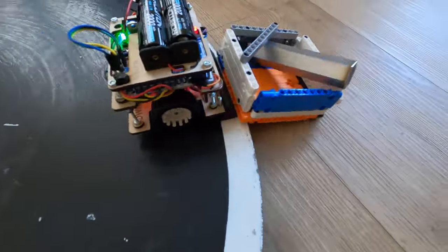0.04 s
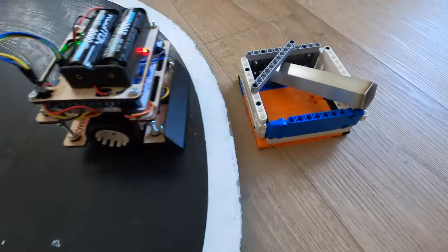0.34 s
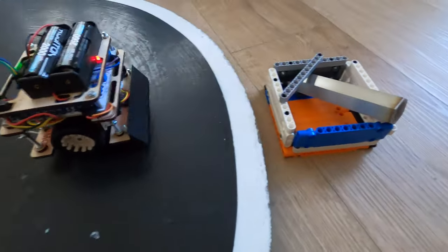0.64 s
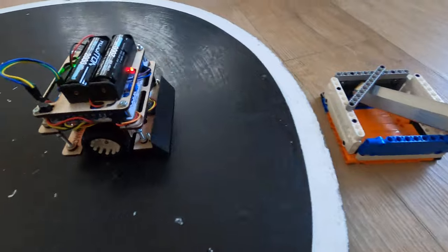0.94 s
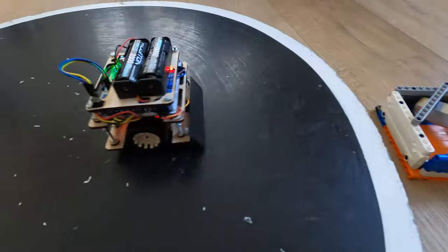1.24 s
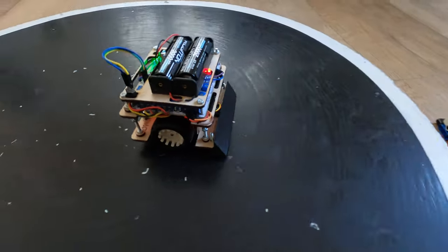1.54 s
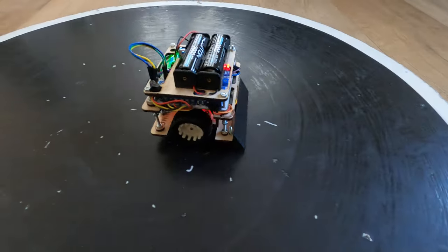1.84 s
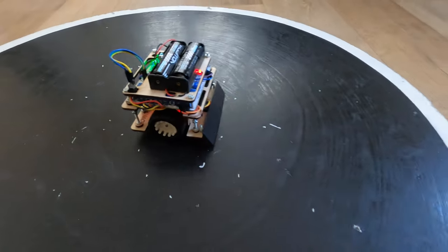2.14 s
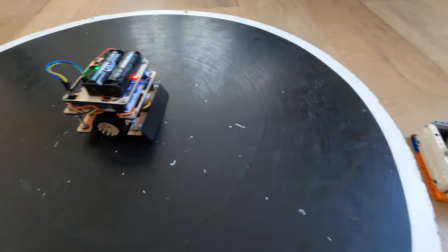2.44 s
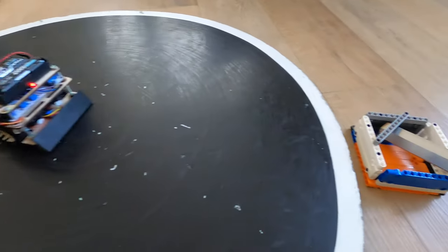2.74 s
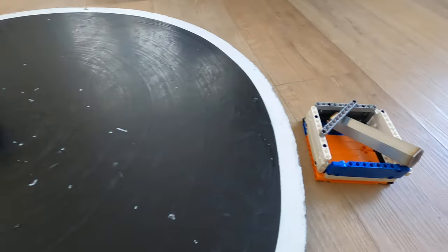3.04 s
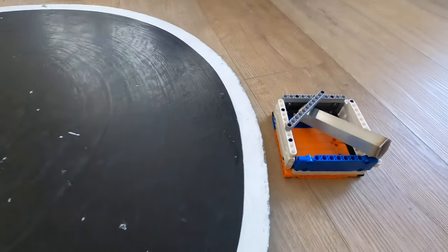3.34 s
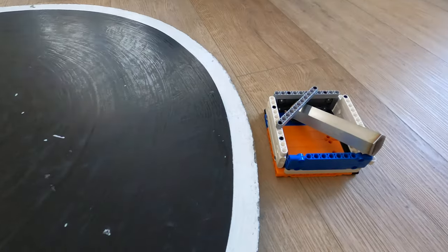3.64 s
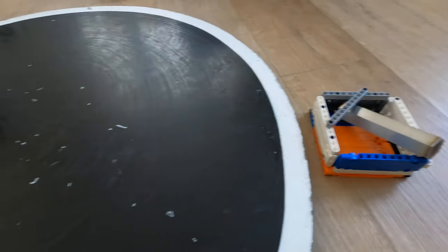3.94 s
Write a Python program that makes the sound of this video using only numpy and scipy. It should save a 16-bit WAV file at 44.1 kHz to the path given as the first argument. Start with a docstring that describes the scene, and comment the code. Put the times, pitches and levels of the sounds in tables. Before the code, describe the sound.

A small robot shoves a scraping plastic box, then whirs and rattles around indoors.

```python
"""A box of plastic bricks scrapes off a round board and clacks onto a wooden floor, shoved by a small
wheeled robot that then drives about. The box scrapes because its base catches and slips very fast.
The robot's gear teeth click into a whir, its motors whine faintly, its axle squeaks and its loose frame
rattles, while the board booms under the wheels. The robot ends up to the left, in a small room."""
import sys
import numpy as np
from scipy import signal
from scipy.fft import rfft, irfft, next_fast_len
from scipy.io import wavfile
from scipy.ndimage import uniform_filter1d

SR = 44100
rng = np.random.default_rng(int(sys.argv[2]) if len(sys.argv) > 2 else 0)


def unload_audio(sound):
    """Save the sound as a 16-bit wav file, at the path given as the first command line argument."""
    columns = np.transpose(np.atleast_2d(sound))
    # keep every value between -1 and 1, then stretch to whole-number steps
    steps = np.round(np.clip(columns, -1, 1) * 32767)
    wavfile.write(sys.argv[1], SR, steps.astype(np.int16))


N = 176400
T = np.arange(N) / SR

# Tone of the background noise, the echo, and the left microphone against the right: (pitch [Hz], gain [dB])
BACKGROUND_TONE = [(20, -12), (70, 7), (160, 1), (300, -11.5), (800, -20), (5000, -22), (15500, -36)]
ECHO_TONE = [(60, -25), (400, -9.5), (1200, -6.5), (3000, -7), (6000, -12.5), (12000, -2.5)]
MIC_BALANCE = [(100, 0.5), (600, -2), (1300, 0), (2800, 2), (5500, -3), (11000, -4)]
# Where the robot is heard: (time [s], left over right [dB], delay on the left [samples])
ROBOT_PATH = [(0, -1.5, 1.1), (.3, -1.5, 1.55), (.6, 2, 0.18), (1.2, 1, 0.57), (2.2, -1, 1.2),
              (2.6, 2, 0.023), (3.0, 4.5, 0.78), (3.5, 5.5, 1.2), (4, 5, 0.94)]
# Wheel jolts that swell the board's boom: (peak time [s], level [dB], half-width [s])
WHEEL_JOLTS = [(.04, -30.5, 0.051), (.185, -29.5, 0.07), (.5, -41.5, 0.19), (0.659, -40.5, 0.029),
               (.8, -41.5, 0.081), (0.899, -41, 0.036), (1.08, -46, 0.021), (1.25, -36.5, 0.04),
               (1.41, -37.5, 0.087), (1.657, -37, 0.034), (1.79, -47, 0.065), (2.03, -47.5, 0.095),
               (2.18, -42, 0.038), (2.57, -41.5, .055), (2.81, -41, 0.091), (3.05, -47.5, .035),
               (3.241, -42, 0.028), (3.45, -39, 0.046), (3.56, -39, 0.12), (3.84, -32.5, 0.067),
               (3.95, -38, 0.053)]
# When the motors are throttled: (start [s], end [s], level [dB])
THROTTLE_SPELLS = [(1.09, 1.383, -0.5), (1.67, 2.044, -2.5), (2.125, 2.586, -2), (2.72, 2.783, -4),
                   (3.133, 3.46, -10.5)]
# Squeaks of the dry axle: (time [s], level [dB], pitch [Hz])
AXLE_SQUEAKS = [(1.675, -44.5, 6700), (2.075, -42.5, 7800), (2.138, -49, 6300), (2.675, -49.5, 7460),
                (2.725, -43.5, 6270), (2.87, -49, 7130), (2.925, -49, 6800)]
# How loud the gears run: (time [s], whir level [dB], treble level [dB])
GEAR_LEVELS = [(0, -51, -50), (.4, -44, -54), (.6, -43, -44.5), (.74, -48.5, -54), (.83, -47.5, -53),
               (1.1, -47, -53), (1.53, -47, -49.5), (1.63, -46.5, -56.5), (1.95, -47, -50),
               (2.3, -47, -54.5), (2.58, -45, -50.5), (2.75, -50, -56.5), (3.0, -50.5, -60),
               (3.35, -50.5, -56), (3.5, -46, -60), (3.72, -50, -55.5), (3.86, -48.5, -51), (4, -40, -45)]
# Gears sing as a wheel's load changes: (start [s], length [s], from [Hz], to [Hz], level [dB])
GEAR_SONGS = [(1.32, 0.17, 2820, 2927, -45), (1.675, 0.083, 4760, 5150, -54), (1.68, .12, 2730, 2800, -56),
              (1.83, .16, 4490, 4340, -65), (1.85, .19, 2752, 2920, -46.5), (2.66, 0.44, 3300, 3310, -59.5),
              (2.62, 0.86, 7670, 7120, -62.5)]
# Where the gear housings ring: (pitch [Hz], level relative to the whir curve [dB])
HOUSING_BANDS = [(2880, -12), (4250, -10.5)]
# Rattles of the loose frame: (time [s], level [dB])
FRAME_RATTLES = [(0.475, -14.5), (0.501, -16), (0.524, -9.5), (.553, -9), (0.594, -12), (0.623, -10.5),
                 (.643, -12.5), (0.689, -11.5), (0.79, -6.5), (0.826, -11.5), (1.237, -12), (1.391, -16.5),
                 (1.437, -3), (1.759, -12.5), (1.813, -15.5), (1.943, -14.5), (2.008, -9), (2.063, -17),
                 (2.133, -17), (2.231, -12.5), (2.46, -13), (2.497, -7.5), (2.576, -9.5), (2.609, -17),
                 (2.78, -15.5), (3.165, -19), (3.223, -15.5), (3.395, -16.5)]
# Sharp ticks from the robot, some from its gears: (time [s], level [dB], pitch [Hz])
ROBOT_TICKS = [(.56, -11.5, 3670), (.582, -11.5, 3600), (.603, -13.5, 6400), (0.695, -15, 3930),
               (.798, -15, 3720), (.835, -11, 3700), (1.445, -9.5, 3870), (1.59, -22, 6300),
               (1.623, -16, 3740), (1.764, -23, 6960), (1.818, -22, 3700), (2.015, -9, 3830),
               (2.237, -21, 3660), (2.504, -10, 6520), (2.583, -15, 6300), (3.491, -12, 3880)]
# How the board, the rattled frame and the bumped frame ring: (pitch [Hz], level [dB], time to fade 60 dB [s])
BOARD_RING = [(69.6, -0.5, 0.32), (97.2, -7, 0.36), (128, -20, 0.3), (171, -20.5, 0.27)]
FRAME_RING = [(258, -17.5, 0.041), (383, -14.5, 0.063), (1000, -5.5, 0.029), (1163, -7.5, 0.035),
              (1810, -3, 0.015), (2826, 2.5, 0.023), (3560, -2, 0.0082), (3980, -5, 0.024)]
BUMP_RING = [(1083, -5.5, 0.036), (1910, 2, 0.022), (2460, -7, 0.013), (3080, 4, 0.031), (3620, 3.5, 0.023),
             (4100, -7, 0.021)]
# Blows to the robot and to the box: (time [s], level [dB], fade time [s], brightness [dB per octave])
ROBOT_BUMPS = [(2.497, -9, .004, -4), (2.577, -13, .004, -8.5), (3.454, -15, 0.0024, -2.5),
               (3.4838, -3, 0.0021, -1), (3.571, -19.5, 0.0039, -3), (3.649, -12, 0.0042, -3),
               (3.765, -12.5, 0.0024, -1), (3.821, -12.5, 0.0046, 4), (3.893, -8, 0.0024, -2),
               (3.963, -8.5, 0.002, -2.5)]
BOX_HITS = [(.0065, 8.5, 0.0042, -6.5), (.013, -7, 0.0019, -0.5), (.158, -8, 0.0012, -9),
            (.272, 9, 0.00062, -1), (.2734, 13, 0.00093, 0.5), (.320, -0.5, 0.0011, -3.5)]
# The box sliding: (time [s], level [dB])
SLIDE_LEVELS = [(0, -43), (.012, -22.5), (.035, -30), (.065, -30), (.085, -28), (.11, -23.5), (.13, -24.5),
                (.141, -17.5), (.156, -19), (.168, -33.5), (.2, -33), (.21, -28), (.232, -30), (.262, -31),
                (.272, -25.5), (.282, -48), (.32, -35.5), (.4, -45), (.5, -100)]
# The base of the box juddering: (time [s], pitch [Hz], level [dB])
BOX_JUDDER = [(.02, 1700, -50), (.04, 900, -38), (.125, 1000, -36), (.148, 1150, -41), (.17, 1350, -40),
              (.22, 1550, -37), (.265, 1500, -33), (.285, 1500, -100)]
# Which pitches are strong in each sound: (pitch [Hz], gain [dB])
ROLLING_TONE = [(20, -35), (40, -28), (65, 2.5), (95, 2), (125, -11), (165, -4.5), (260, -25), (600, -67)]
SIZZLE_TONE = [(3500, -27), (5500, -1.5), (6400, -1), (7000, 0), (7900, 3), (9500, -7), (11500, -7.5),
               (13500, -17), (15500, -33)]
WHIR_TONE = [(130, 2.5), (260, -4.5), (390, 1), (560, -5), (690, -11.5), (830, -13), (1060, 0.5),
             (1350, -9.5), (1520, -7.5), (1850, -1.5), (2400, -2), (2850, -1.5), (3200, -0.5), (4150, 2),
             (5500, -4), (6500, -6.5), (9000, -30)]
SCUFF_TONE = [(100, -9), (380, 2), (750, -5.5), (1300, -20), (3000, -3.5), (8000, -25)]
BUMP_TONE = [(150, -12.5), (400, 2.5), (750, -14.5), (1100, 9.5), (1450, -9.5), (1950, 7), (2600, 2.5),
             (3500, 12), (4800, 1.5), (7000, -7), (15500, -37)]
SLIDE_TONE = [(130, -5), (300, -8.5), (520, -7.5), (720, -2), (1000, 1), (1500, -2.5), (2100, -2),
              (3100, -2), (4400, -5.5), (5300, -10.5), (8000, -16.5), (15500, -39.5)]
CLACK_TONE = [(120, -4.5), (300, -10.5), (600, 3.5), (1200, -1.5), (2200, -1), (3400, 7.5), (4300, 4),
              (5300, -1.5), (7000, -15), (15500, -29)]


def from_db(db):
    """Turn decibels into a number to multiply by."""
    return 10 ** (np.asarray(db) / 20)


def rms_one(x):
    """Scale a steady sound to an average power of 1."""
    return x / np.sqrt(np.mean(x ** 2) + 1e-20)


def energy_one(x):
    """Scale a short sound to a total energy of 1."""
    return x / np.sqrt(np.sum(x ** 2) + 1e-20)


def in_time(rows):
    """Join a table's points with lines: one curve for each column after the time."""
    s, *columns = np.transpose(rows)
    return [np.interp(T, s, c) for c in columns]


def add(out, s, sound):
    """Mix a sound in at s seconds."""
    i = int(np.clip(s * SR, 0, N - 1))
    out[i:i + len(sound)] += sound[:N - i]


def sine(hz):
    """A pure tone that follows a pitch curve."""
    return np.sin(2 * np.pi * np.cumsum(hz) / SR)


def swell(s, width_s):
    """A bell-shaped rise and fall."""
    return np.exp(-((T - s) / width_s) ** 2)


def shaped(x, tone, tilt_db=0):
    """Filter a sound through (pitch [Hz], gain [dB]) points, tilted per octave around 2 kHz."""
    n = next_fast_len(2 * x.shape[-1], real=True) // 2 * 2
    octave = np.log2(np.arange(n // 2 + 1) * SR / n + 1)
    hz, db = np.transpose(tone)
    gain_db = np.interp(octave, np.log2(hz), db) + tilt_db * np.clip(octave - 11, -2, 2)
    # These steps make the filter ring only after a click, never before it.
    cepstrum = irfft(np.log(from_db(gain_db)))
    cepstrum[1:n // 2] *= 2
    cepstrum[n // 2 + 1:] = 0
    return irfft(rfft(x, n) * np.exp(rfft(cepstrum)))[..., :x.shape[-1]]


def drift(hz):
    """A smooth random wobble of about size 1; more hz makes it faster."""
    r = np.exp(-80 * np.pi * hz / SR)
    slow = signal.lfilter([1], [1, -2 * r, r * r], rng.standard_normal(N // 40 + 2002))[2000:]
    return np.interp(np.arange(N) / 40, np.arange(len(slow)), rms_one(slow))


def clicks(per_s, spread_db):
    """Clicks at random times; more spread makes their sizes less even."""
    sizes = from_db(spread_db * np.minimum(rng.exponential(1, N), 4))
    return (rng.random(N) < per_s / SR) * sizes * rng.choice([-1, 1], N)


def burst(fade_s):
    """The quickly dying hiss of two things touching."""
    fade = np.exp(-T[:8192] / fade_s)
    spectrum = rfft(rng.standard_normal(len(fade)) * fade)
    even_noise = irfft(spectrum / (abs(spectrum) + 1e-9))
    return energy_one(even_noise * np.sqrt(fade))


def ringing(modes, vary_db):
    """A struck object rings with several fading tones, their strengths varied by chance."""
    t, out = T[:SR // 2], 0
    for k, (hz, db, fade_s) in enumerate(modes):
        level = from_db(db + vary_db * rng.normal() - 60 * t / fade_s)
        out += (-1) ** k * level * np.sin(2 * np.pi * hz * t)
    return out


def knocks(rows, tone):
    """Blows on plastic that die away at once."""
    out = np.zeros(N)
    for s, db, fade_s, tilt_db in rows:
        add(out, s, from_db(db) * energy_one(shaped(burst(fade_s), tone, tilt_db)))
    return out


def placed(x):
    """Loudness and delay at the two microphones follow the robot."""
    pan_db, lag = in_time(ROBOT_PATH)
    left = np.interp(T - lag / SR, T, x)
    return np.array([left * from_db(pan_db / 2), x * from_db(-pan_db / 2)])


def background():
    """A faint, low rumble, nearly the same on both sides."""
    noise = rng.standard_normal(N) + 0.35 * rng.standard_normal((2, N))
    return from_db(-54.5) * rms_one(shaped(noise, BACKGROUND_TONE))


def room_echo(x, fade_s=0.19, gap_s=0.004, change_s=0.1986):
    """Six short stereo echoes take turns, so the room's sound shifts as the robot moves."""
    t, out = T[:SR // 2], np.zeros((2, N))
    tails = rng.standard_normal((6, 2, len(t))) * from_db(-60 * t / fade_s) * (t > gap_s)
    for k, pair in enumerate(tails):
        turn = (T / change_s + k) % len(tails)
        share = np.sqrt(np.maximum(0, 1 - abs(turn - 1)))
        out += [signal.fftconvolve(x * share, energy_one(tail))[:N] for tail in pair]
    return shaped(out, ECHO_TONE)


def board_boom(boom_hz=71.4, drop_s=0.275, low_cut_hz=38):
    """The wheels keep the board's lowest note booming; the falling box strikes it once."""
    jolt_power = sum((from_db(db) * swell(s, width_s)) ** 2 for s, db, width_s in WHEEL_JOLTS)
    level = np.sqrt(from_db(-58) ** 2 + jolt_power)
    boom = from_db(-0.5) * np.sqrt(2) * sine(boom_hz + 4 * drift(10.7))
    rolling = from_db(-9.5) * rms_one(shaped(rng.standard_normal(N), ROLLING_TONE))
    out = level * (boom + rolling)
    add(out, drop_s, from_db(-15) * ringing(BOARD_RING, vary_db=1))
    return signal.sosfilt(signal.butter(2, low_cut_hz, "high", fs=SR, output="sos"), out)


def motor_whine(switch_hz=2385, beat_hz=9.2):
    """Current switched on and off makes the motors sing; the two beat against each other."""
    spells = sum(from_db(db) * ((T > start) & (T < end)) for start, end, db in THROTTLE_SPELLS)
    hz = switch_hz * (1 + 0.002 * drift(61))
    throb = 1 + 0.68 * np.sin(2 * np.pi * beat_hz * T + drift(2.1))
    whine = np.sqrt(2) * (from_db(-62.5) * sine(hz) + from_db(-56) * sine(2 * hz))
    return uniform_filter1d(spells, size=800) * throb * whine


def axle_squeaks():
    """A dry axle gives short squeaks, hoarse because their pitch shakes."""
    return sum(from_db(db) * swell(s, width_s=0.0091) * np.sqrt(2) * sine(hz * (1 + 0.18 * drift(400)))
               for s, db, hz in AXLE_SQUEAKS)


def tooth_chirps(per_s=18, length_s=0.019, low_hz=5390, high_hz=9050):
    """Dry gear teeth give brief sliding squeaks at random."""
    out, progress = np.zeros(N), np.linspace(0, 1, int(length_s * SR))
    jitter = 0.025 * drift(700)
    # Each chirp starts within the first second.
    for s, pitch, slide, size in rng.random((600, 4))[:int(per_s * N / SR)]:
        hz = low_hz * (high_hz / low_hz) ** pitch
        shake = jitter[int(s * (N - len(progress))):][:len(progress)]
        track = hz * (1 + 0.053 * (2 * slide - 1) * progress + shake)
        level = from_db(-2 + 10 * size) * low_hz / hz
        add(out, s, level * np.sin(np.pi * progress) * sine(track))
    return out


def crumb_snaps(per_s=41, fade_s=0.0067):
    """Crumbs snap under the wheels, each a tiny puff of bright noise."""
    snaps = abs(clicks(per_s, spread_db=3)) + 1e-18
    fades = signal.lfilter([1], [1, -np.exp(-1 / (fade_s * SR))], snaps)
    return from_db(-6) * rms_one(shaped(fades * rng.standard_normal(N), SIZZLE_TONE))


def gear_sizzle(clicks_per_s=800):
    """Small gears click brightly in spurts, mixed with chirps and crumbs; stereo, with echo."""
    shared, left, right = [rms_one(shaped(clicks(clicks_per_s, 0), SIZZLE_TONE)) for _ in range(3)]
    _, treble_db = in_time(GEAR_LEVELS)
    flutter_db, spurts_db = 2 * drift(22), 3 * drift(61)
    level = from_db(treble_db - 2 + flutter_db + spurts_db)
    direct = level * (shared + tooth_chirps() + crumb_snaps())
    scattered = 0.67 * level * np.array([left, right])  # the frame sends each side its own clicks
    return placed(direct) + room_echo(direct) + scattered


def gear_note(length_s, from_hz, to_hz):
    """Meshing gears sing a rough note that swells, slides in pitch and fades."""
    progress = np.linspace(0, 1, int(length_s * SR))
    counts = [int(length_s * per_s) + 2 for per_s in (300, 120)]
    jitter, flutter = [np.interp(progress, np.linspace(0, 1, n), rng.standard_normal(n)) for n in counts]
    hz = (from_hz + (to_hz - from_hz) * progress) * (1 + 0.0099 * jitter)
    return np.sqrt(2 * abs(np.sin(np.pi * progress))) * from_db(3.5 * flutter) * sine(hz)


def gearboxes(teeth_per_s=1100, notes_per_s=22, note_s=0.06):
    """Tooth clicks ring the housings and blur into a whir; gear notes slide in and out of it."""
    whir = from_db(-1.5) * rms_one(shaped(clicks(teeth_per_s, spread_db=1), WHIR_TONE))
    for hz, db in HOUSING_BANDS:
        for s in np.arange(0, N / SR, 1 / notes_per_s):
            from_hz, to_hz = hz * (1 + 0.05 * (rng.normal() + rng.uniform(-0.48, 0.51, 2)))
            add(whir, s + rng.random() / notes_per_s, from_db(db) * gear_note(note_s, from_hz, to_hz))
    out = whir * from_db(in_time(GEAR_LEVELS)[0])
    for s, length_s, from_hz, to_hz, db in GEAR_SONGS:
        add(out, s, from_db(db) * gear_note(length_s, from_hz, to_hz))
    return out


def loose_parts(taps_per_s=90):
    """Loose parts tap lightly on the frame, growing and fading with the whir."""
    taps = signal.fftconvolve(clicks(taps_per_s, spread_db=3.5), ringing(FRAME_RING, vary_db=1))[:N]
    return from_db(in_time(GEAR_LEVELS)[0] - 7.5) * rms_one(taps)


def tyre_scuff(at_s=3.79):
    """A tyre rubs once on the board's rim."""
    rubbing = rms_one(shaped(clicks(per_s=1660, spread_db=2.5), SCUFF_TONE))
    return from_db(-42.5) * swell(at_s, width_s=0.039) * rubbing


def robot_ticks():
    """Sharp ticks from the robot, some from its gears: a bright crack and one short ring."""
    crack_tone = [(500, -6), (2500, -5), (4000, 10.5), (8000, 5), (15500, -15)]
    out = np.zeros(N)
    for s, db, hz in ROBOT_TICKS:
        contact = burst(fade_s=0.0013)
        ring = energy_one(signal.fftconvolve(contact, ringing([(hz, 0, 0.016)], vary_db=0)))
        crack = energy_one(shaped(contact, crack_tone))
        add(out, s, from_db(db) * (0.85 * ring[:len(contact)] + 0.64 * crack))
    return out


def frame_rattles():
    """Each rattle is a sharp crack that sets the loose frame ringing."""
    crack_tone = [(200, -11.5), (800, -13.5), (3000, 6), (7500, -6), (15500, -21)]
    out = np.zeros(N)
    for s, db in FRAME_RATTLES:
        contact = burst(fade_s=0.0032)
        ring = energy_one(signal.fftconvolve(contact, ringing(FRAME_RING, vary_db=4.5))[:len(contact)])
        crack = energy_one(shaped(contact, crack_tone))
        add(out, s, from_db(db) * energy_one(ring + from_db(-5) * crack))
    return out


def robot_bumps(settle_s=0.029):
    """The robot bumps about near the rim; each knock rings the frame while loose parts settle."""
    out = knocks(ROBOT_BUMPS, BUMP_TONE)
    for s, db, fade_s, _ in ROBOT_BUMPS:
        contact = burst(fade_s) + from_db(-8) * burst(settle_s)
        ring = energy_one(signal.fftconvolve(contact, ringing(BUMP_RING, vary_db=9)))
        add(out, s, from_db(db - 4) * ring)
    return out


def box_scrape(slips_per_s=7000):
    """The base of the box catches and slips thousands of times a second, and judders with a rough tone."""
    slide_db, = in_time(SLIDE_LEVELS)
    slips = clicks(slips_per_s, spread_db=1) * from_db(2.64 * drift(95))
    scrape = from_db(slide_db) * rms_one(shaped(slips, SLIDE_TONE))
    hz, judder_db = in_time(BOX_JUDDER)
    judder = np.sqrt(2) * sine(hz * (1 + 0.089 * drift(336)))
    return scrape + judder * from_db(judder_db - 2.5 * drift(36))


def box_clacks():
    """The plastic box knocks as it is shoved, then clacks onto the floor."""
    return knocks(BOX_HITS, CLACK_TONE)


def scene():
    """Mix the box, the robot, the board and the room in stereo."""
    clacks = box_clacks()
    echoing = box_scrape() + frame_rattles() + robot_ticks() + loose_parts() + robot_bumps()
    echoing += tyre_scuff() + gearboxes() + axle_squeaks() + motor_whine()
    low_sounds = board_boom() + background()
    return placed(clacks + echoing) + room_echo(echoing) + gear_sizzle() + low_sounds


def record(dry, cutoff_hz=15800):
    """Each microphone has its own tone; peaks are clipped and the highest treble is cut."""
    left = shaped(dry[0], [(hz, db / 2) for hz, db in MIC_BALANCE])
    right = shaped(dry[1], [(hz, -db / 2) for hz, db in MIC_BALANCE])
    treble_cut = signal.ellip(10, 0.05, 60, cutoff_hz, fs=SR, output="sos")
    return signal.sosfiltfilt(treble_cut, np.clip([left, right], -1, 1))


dry = scene()
out = record(dry)
unload_audio(out)
```